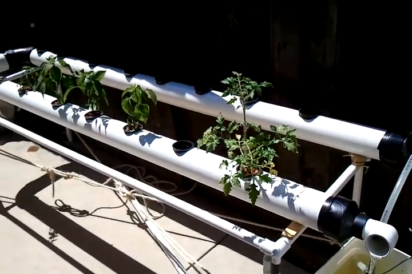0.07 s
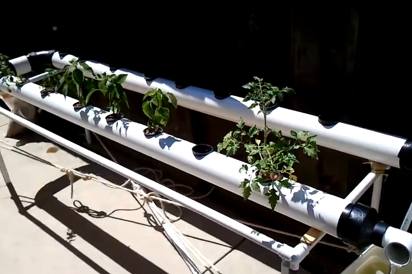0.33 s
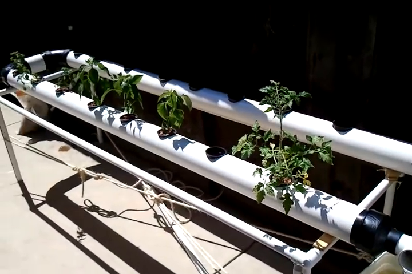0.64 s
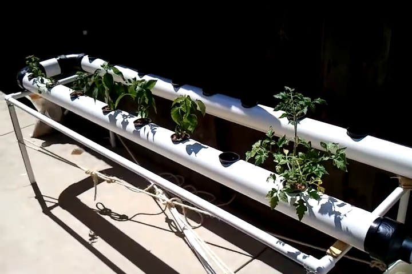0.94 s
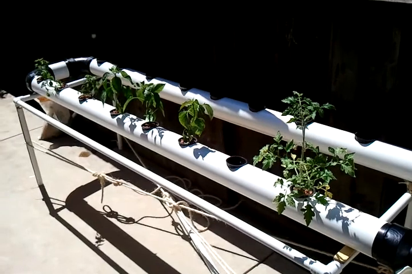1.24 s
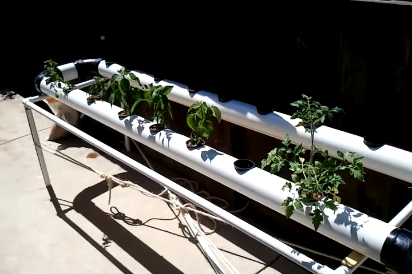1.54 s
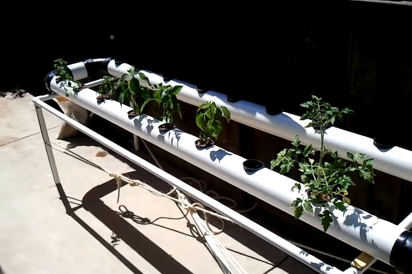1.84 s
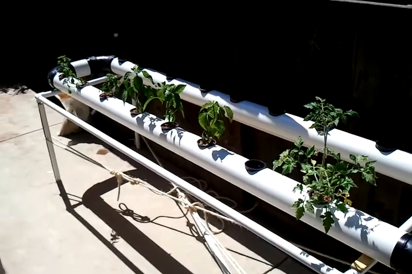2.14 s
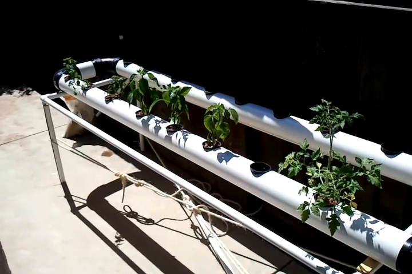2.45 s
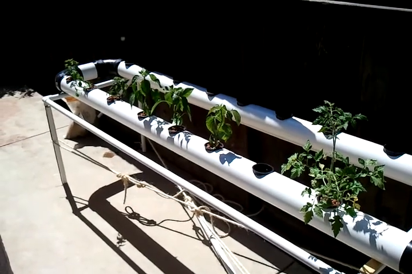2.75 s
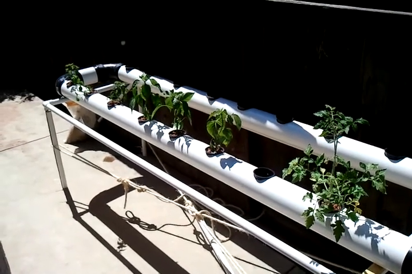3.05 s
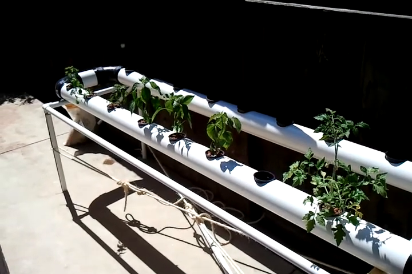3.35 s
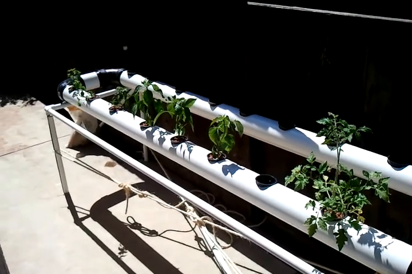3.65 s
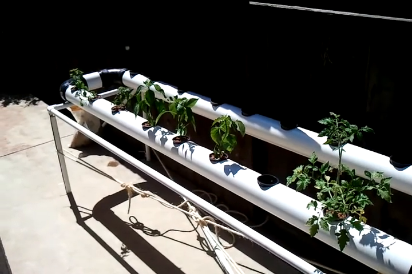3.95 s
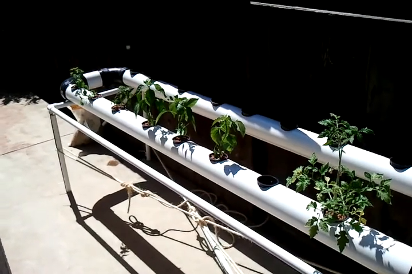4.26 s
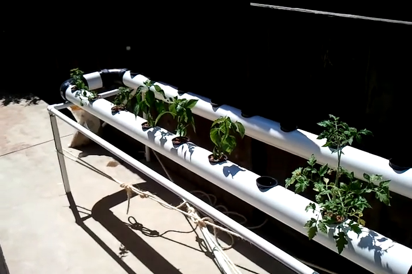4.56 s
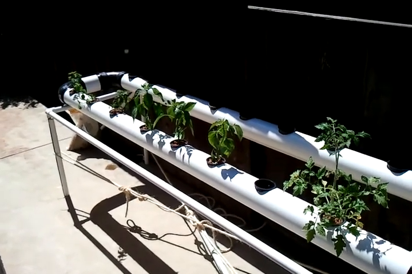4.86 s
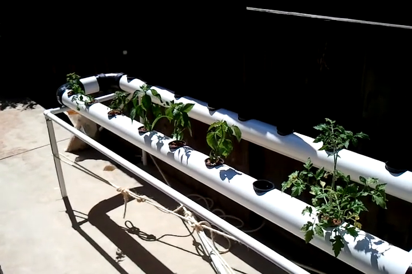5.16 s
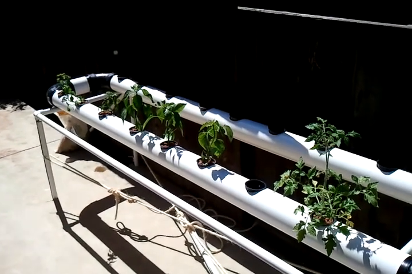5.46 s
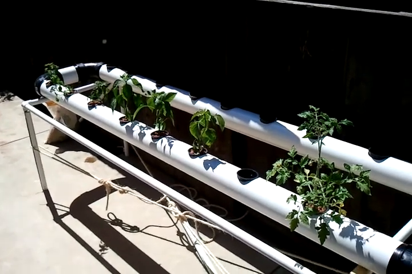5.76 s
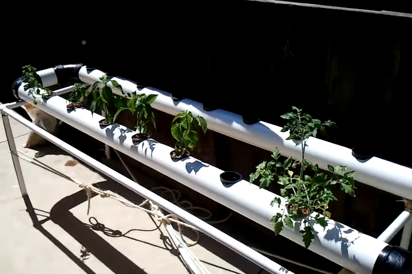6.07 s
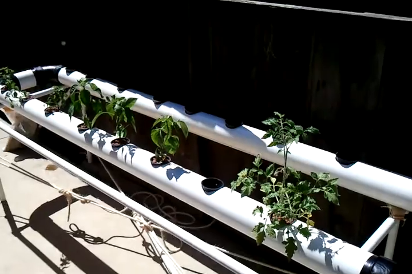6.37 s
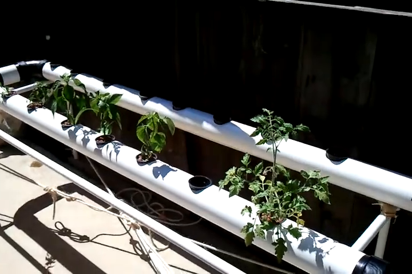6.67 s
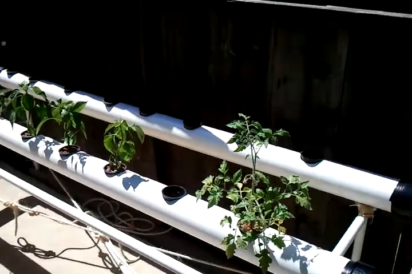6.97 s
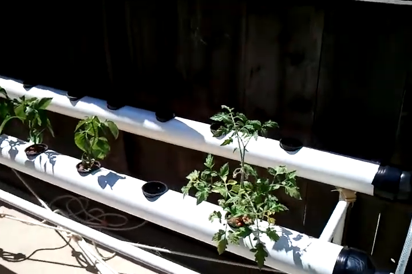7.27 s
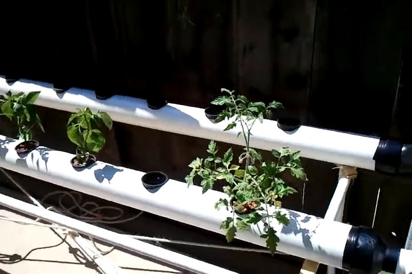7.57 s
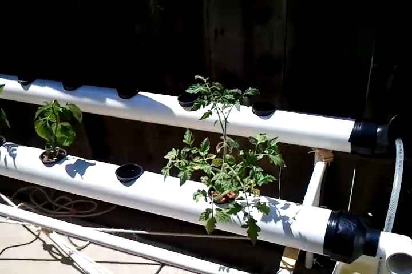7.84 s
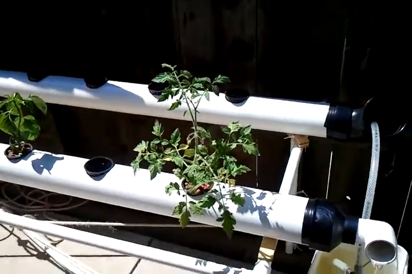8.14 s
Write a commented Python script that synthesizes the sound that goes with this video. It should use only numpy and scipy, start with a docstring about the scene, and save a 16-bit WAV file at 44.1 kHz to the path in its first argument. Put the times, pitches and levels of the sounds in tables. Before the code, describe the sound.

Steady bubbling water runs into a plastic bucket, joined later by sharp close knocks and rubbing from fingers handling the microphone.

```python
"""In a walled yard a pump hums and a far engine drones while the return pipe of a hydroponic rack
pours into a plastic bucket: churning bubbles, a hollow gurgle, fine spray. Gulps break through, each
dragging a surge of bubbles down with it, among bright plinks and splashes. From about 5.6 s, over the
running water, fingers knock on the case that holds the microphone, hard enough to overload it.
Their skin slides over the case in short strokes, which crowd into the last second."""
import sys
import numpy as np
from scipy import signal
from scipy.fft import rfft, irfft, next_fast_len
from scipy.io import wavfile

SR = 44100
rng = np.random.default_rng(int(sys.argv[2]) if len(sys.argv) > 2 else 0)


def waveform_to_disk(signal):
    """Save audio, clipped to [-1, 1], as 16-bit WAV at the path in sys.argv[1]."""
    frames = np.transpose(np.atleast_2d(signal))
    scaled = np.clip(frames, -1, 1) * 32767
    samples = np.round(scaled).astype(np.int16)
    wavfile.write(sys.argv[1], SR, samples)


N = 366459
TIME = np.arange(N) / SR

# even wash of pour and yard, blurred by the walls: (frequency [Hz], relative level [dB])
YARD_TONE = [(20, -13.5), (45, -3), (80, 0.5), (170, 6), (270, 2), (500, 4.5), (950, 4), (1300, -4),
             (1800, -5), (2700, -9.5), (5000, -13), (8000, -15.5)]
# pump, louder where the walls reinforce it: (time [s], relative level [dB])
PUMP_FADER = [(0, -61.5), (1.1, -70.5), (1.9, -63.5), (2.55, -70.5), (3.8, -56.5), (5.1, -56), (7.3, -63),
              (7.9, -75)]
# partials of the pump's hum: (multiple of the pitch, relative level [dB])
PUMP_PARTIALS = [(.5, -18), (1, 0), (1.5, -23), (2, -12), (2.5, -18)]
# partials of its mains buzz: (multiple of the pitch, level [dB])
MAINS_PARTIALS = [(1, -65.5), (3, -68), (4, -73), (5, -77.5), (6, -68.5)]
# far engine, unevenly running down: (time [s], firing rate [Hz], relative level [dB])
ENGINE_RUN = [(0, 112.9, -57), (.9, 113.7, -66), (1.6, 113.6, -62), (2.0, 104.2, -73), (2.5, 105, -57),
              (3.1, 107.7, -66), (3.8, 110.6, -56), (5.2, 108, -70), (6.3, 102.4, -61.5), (8.3, 102.4, -68)]
# weight of the churning bubbles by pitch: (pitch [Hz], relative level [dB])
CHURN_TONE = [(300, -8.5), (450, -16.5), (700, 2.5), (950, 3), (1280, -5.5), (1800, -1), (2600, -19),
              (4000, -7), (6000, -21)]
# resonances of the air above the water in the bucket: (frequency [Hz], width [Hz], boost [dB])
BUCKET_MODES = [(355, 35, 6.5), (493, 26, 9), (888, 31, 1), (1433, 120, 4.5)]
# the bucket's hollow note, clearest when its mouth faces the microphone: (time [s], level [dB])
GURGLE_FADER = [(0, -58.5), (.85, -59.5), (1.2, -64), (2.6, -77), (8.3, -63)]
# ticks of fine spray: (frequency [Hz], relative level [dB])
SPRAY_TONE = [(1200, 1), (2000, -2.5), (2800, 2), (4000, -8), (5000, 3), (6500, 4.5), (8000, -1.5),
              (10000, -6.5)]
# large air pockets pulled under: (time [s], relative level [dB], pitch [Hz], surge trim [dB])
GULP_CUES = [(0.048, -33, 885, -3), (0.17, -37, 900, -9), (0.491, -32.5, 953, -2), (0.76, -35, 990, 2),
             (0.869, -40.5, 970, 0), (1.048, -39, 1010, 0), (1.142, -35, 837, 6), (1.25, -42, 890, 6),
             (1.496, -37.5, 653, 4), (1.585, -40, 653, 8), (1.798, -33, 369, 0), (1.854, -37, 362, -2),
             (1.949, -29, 880, 1), (2.339, -33.5, 820, -6), (2.525, -36.5, 895, 1), (2.64, -46, 650, 11),
             (2.879, -38, 1016, 1), (3.2, -43, 900, 5), (3.329, -42.5, 890, 8), (3.607, -28, 868, -0.5),
             (3.649, -36.5, 527, -11), (3.734, -38, 960, -10), (4.05, -40, 838, 4), (4.272, -41, 354, -15),
             (4.606, -34, 652, 3), (4.891, -34, 905, -4), (5.15, -39.5, 845, 6), (5.313, -33, 350, 0.5),
             (5.359, -37, 887, -2), (5.438, -34, 640, 1), (5.486, -30.5, 867, -3), (6.956, -31.5, 528, 4)]
# the clearest small bubbles: (time [s], relative level [dB], pitch [Hz])
PLINK_CUES = [(0.0726, -47, 1720), (0.4343, -44, 1810), (0.555, -46, 1780), (0.664, -44, 1970),
              (1.282, -43.5, 2180), (1.3824, -43, 3540), (1.4331, -48, 3560), (2.5516, -47, 1790),
              (2.923, -45, 1680), (3.052, -44.5, 1953), (3.4067, -40.5, 4630), (3.585, -46, 2960),
              (4.6466, -48, 1850), (5.0427, -42.5, 5230), (5.096, -49, 1970), (6.5127, -43.5, 4800)]
# the largest drops slapping the surface: (time [s], relative level [dB])
SPLASH_CUES = [(0.115, -41.5), (0.1836, -46), (0.3113, -40.5), (0.3975, -42), (0.806, -42.5),
               (1.1698, -42.5), (1.231, -39), (1.4367, -44), (2.2566, -46), (2.564, -41), (2.8785, -37),
               (2.9218, -42), (4.4842, -43), (4.8865, -40), (5.1425, -41), (6.0374, -46), (6.6965, -42.5),
               (6.7354, -43.5), (7.1891, -42.5)]
# fingers on the case: (time [s], strength [dB], contact brightness [Hz], pitch ratio set by the grip)
KNOCK_CUES = [(5.5767, 21, 784, 1.19), (5.6454, 25.5, 1360, 1.18), (5.688, 36.5, 1396, 1.23),
              (5.7781, 19.5, 1030, 1), (5.7933, 14, 790, 1.06), (6.2245, 19.5, 1068, 0.99),
              (6.3346, 19.5, 1035, 0.98), (6.8836, 26, 1100, .98), (7.3054, 25.5, 1206, 0.96),
              (7.323, -1, 665, 0.56), (7.338, -7, 600, 0.6), (7.3566, -4, 600, 0.61),
              (7.391, 18, 586, 0.59), (7.3948, 11, 950, 1.04), (7.485, 1.5, 2050, 1.34),
              (7.5975, 20.5, 970, 1.02), (7.6992, 29, 720, 0.8), (7.7067, 16, 770, 1.15),
              (7.7939, 17, 970, 0.99), (7.829, -7, 660, 0.67)]
# resonances of the case: (frequency [Hz], width [Hz], boost [dB], share of the grip's pitch shift)
CASE_MODES = [(519, 154, 9.5, 0.52), (1120, 194, 7.5, 0.69), (1762, 160, 12.5, 0.074),
              (2840, 210, 18, 0.85), (4730, 1220, 11, 0.56)]
# colour of the crunch that overload adds: (frequency [Hz], gain [dB])
OVERLOAD_TONE = [(60, -18), (160, -11), (350, 0), (7000, 0), (8500, -10), (16000, -8)]
# skin sliding over the case: (time [s], swell [s], length [s], level [dB], hiss against the rub [dB])
STROKE_CUES = [(5.863, .015, .022, -41, -16), (5.877, .025, 0.033, -37.5, -11.5),
               (6.94, 0.039, 0.1, -52.5, -14), (7.114, 0.022, 0.043, -51.5, -12),
               (7.358, .02, 0.04, -47, -11.5), (7.479, 0.0035, 0.22, -37.5, -9.5),
               (7.502, .04, 0.12, -37, -6), (7.698, 0.036, 0.087, -32.5, -14.5),
               (7.816, 0.047, 0.087, -39, -12), (7.969, 0.012, 0.053, -36.5, -4.5),
               (8.014, 0.028, 0.19, -37, -12), (8.189, 0.03, 0.061, -31.5, -22),
               (8.264, 0.025, .04, -32.5, -21)]
# hollow rub through the case: (frequency [Hz], relative level [dB])
RUB_TONE = [(100, -27.5), (350, -28), (550, -11), (800, -4.5), (1050, 0.5), (1300, -1.5), (1600, 2.5),
            (1900, -5), (2300, -13), (3000, -24), (4500, -34)]
# hiss of the skin: (frequency [Hz], relative level [dB])
HISS_TONE = [(1500, -28.5), (2400, -5), (3000, 2), (3900, -3), (5200, 2), (6500, -4.5), (8000, -9),
             (10000, -30.5)]


def from_db(db):
    """Decibels to gain."""
    return 10 ** (np.asarray(db) / 20)


def unit_rms(x):
    """Scale to rms 1."""
    return x / np.sqrt(np.mean(x ** 2) + 1e-20)


def automation(rows):
    """Each column of a timed curve, at every sample."""
    times, *columns = np.transpose(rows)
    return [np.interp(TIME, times, column) for column in columns]


def db_at(tone, hz):
    """Read a tone curve on a log-frequency axis."""
    known_hz, db = np.transpose(tone)
    return np.interp(np.log(hz + 1e-3), np.log(known_hz), db)


def colour(x, tone):
    """Equalise with a tone curve; rms 1."""
    size = next_fast_len(N)
    hz = np.arange(size // 2 + 1) * SR / size
    return unit_rms(irfft(rfft(x, size) * from_db(db_at(tone, hz)), size)[:N])


def drift(rate_hz):
    """Smooth random wander of spread 1."""
    hop, settle = 40, 2000
    pole = np.exp(-2 * np.pi * hop * rate_hz / SR)
    noise = rng.standard_normal(N // hop + settle + 2)
    slow = signal.lfilter([1], [1, -2 * pole, pole * pole], noise)[settle:]
    return np.interp(np.arange(N) / hop, np.arange(len(slow)), unit_rms(slow))


def band_pass(x, hz, kind, order):
    """Pass the band below ("low") or above ("high") a corner."""
    return signal.sosfilt(signal.butter(order, hz, kind, fs=SR, output="sos"), x)


def resonate(x, modes):
    """Pass a signal through a chain of resonant peaks."""
    for hz, width, boost_db in modes:
        damping, tuning = np.pi * width / SR, -2 * np.cos(2 * np.pi * hz / SR)
        peak = damping * from_db(boost_db)
        x = signal.lfilter([1 + peak, tuning, 1 - peak], [1 + damping, tuning, 1 - damping], x)
    return x


def add(out, start_s, sound):
    """Mix a short sound in at its cue."""
    at = int(np.clip(round(start_s * SR), 0, N - 1))
    out[at:at + len(sound)] += sound[:N - at]


def reflections(x, t60, wet_db):
    """Add dense, dying echoes off nearby surfaces."""
    t = TIME[:SR // 2]
    tail = rng.standard_normal(len(t)) * from_db(-60 * t / t60) * (t > .002)
    return x + from_db(wet_db) * signal.fftconvolve(x, tail / np.linalg.norm(tail))[:N]


def yard_air(level_db):
    """The bed: the walls blur pour and yard into an even wash."""
    return from_db(level_db) * colour(rng.standard_normal(N), YARD_TONE)


def hum(hz, partials, wobble, wobble_hz):
    """Partials on a common pitch, which wanders by the fraction `wobble`."""
    pitch = hz * (1 + wobble * drift(wobble_hz))
    phase = 2 * np.pi * np.cumsum(pitch) / SR
    return sum(from_db(db) * np.sqrt(2) * np.sin(multiple * phase + rng.uniform(0, 2 * np.pi))
               for multiple, db in partials)


def pump(motor_hz, mains_hz, whine_hz):
    """The pump's hum swells and sinks beside its mains buzz and a thin whine."""
    fader_db, = automation(PUMP_FADER)
    motor = from_db(fader_db - 1 + .42 * drift(3.3)) * hum(motor_hz, PUMP_PARTIALS, .0016, 2.54)
    buzz = from_db(1.265 * drift(.72)) * hum(mains_hz, MAINS_PARTIALS, .00055, 1.25)
    whine = from_db(-72.5 + 1.2 * drift(.88)) * hum(whine_hz, [(1, 0)], .00046, 2.7)
    return motor + buzz + whine


def far_engine():
    """A distant engine drones at its firing rate and the octave above."""
    firing_hz, fader_db = automation(ENGINE_RUN)
    gain = from_db(fader_db + .8 * drift(5))
    return gain * hum(firing_hz, [(1, -6), (2, -13.5)], wobble=.0058, wobble_hz=6.8)


def bubble(hz, cycles, rise):
    """A bubble rings down 60 dB in so many cycles, its pitch rising as it nears the surface."""
    t = TIME[:int(cycles / hz * SR) + 2]
    age = t * hz / cycles
    envelope = from_db(-60 * age) * (1 - np.exp(-2 * hz * t))
    return envelope * np.sin(2 * np.pi * hz * t * (1 + rise * age / 2))


def churn(count, cycles, spread_db):
    """The stream drags a cloud of bubbles of all sizes under the surface."""
    out = np.zeros(N)
    for when, pitch, strength, life, rise in rng.random((count, 5)):
        hz = 300 * 20 ** pitch
        gain = from_db(db_at(CHURN_TONE, hz) + spread_db * min(-np.log(strength), 2.5))
        ring_cycles = cycles * (.5 + life) * np.sqrt(hz / 1000)  # small bubbles ring for more cycles
        add(out, when * N / SR, gain * bubble(hz, ring_cycles, .19 * rise))
    return unit_rms(resonate(out, BUCKET_MODES))


def gurgle(count, centre_hz, spread_octaves, waver_db):
    """Bubbles of nearly one size keep the air in the bucket ringing: a hollow, wavering note."""
    waver = from_db(waver_db * drift(5))
    out = np.zeros(N)
    for when, pitch, strength in rng.random((count, 3)):
        hz = centre_hz * 2 ** (spread_octaves * (pitch - .5))
        add(out, when * N / SR, (.5 + strength) * bubble(hz, cycles=37, rise=.04))
    fader_db, = automation(GURGLE_FADER)
    return waver * from_db(fader_db) * unit_rms(out)


def spray(per_s, spread_db, clump_db):
    """Fine droplets tick on the water in little showers."""
    landings = rng.random(N) < per_s / SR
    strength = from_db(spread_db * np.minimum(rng.exponential(1, N), 4) + clump_db * drift(41))
    return colour(landings * strength * rng.choice([-1, 1], N), SPRAY_TONE)


def drops(count, loudest_db, range_db):
    """Stray drops land one by one; each traps a tiny bubble that ticks at a pitch of its own."""
    out = np.zeros(N)
    for when, pitch, softness, life in rng.random((count, 4)):
        tick = bubble(3200 + 4500 * pitch, cycles=5 + 24 * life ** 2, rise=.1)
        add(out, when * N / SR, from_db(loudest_db - range_db * softness) * tick)
    return out


def gulps(body_db, shard_db, ring_s, shard_count):
    """A big bubble rings, and breaks into a few weaker ones that sound the bucket."""
    body, shards = np.zeros(N), np.zeros(N)
    for start_s, db, hz, _ in GULP_CUES:
        add(body, start_s, from_db(db + body_db) * bubble(hz, cycles=ring_s * hz, rise=.37))
        for lag, pitch in rng.random((shard_count, 2)):
            shard = bubble(380 + 1000 * pitch ** 1.4, cycles=15, rise=.17)
            add(shards, start_s + .037 * lag ** 2, from_db(db + shard_db) * shard)
    return body + resonate(shards, BUCKET_MODES)


def surges(trim_db, attack_s, decay_s):
    """Envelope of the bubble cloud that each gulp drags down: a quick swell that dies away."""
    out, t = np.zeros(N), TIME[:SR // 2]
    swell = (1 - np.exp(-t / attack_s)) * np.exp(-t / decay_s)
    for start_s, db, _, surge_db in GULP_CUES:
        add(out, start_s, from_db(db + surge_db + trim_db) * swell)
    return out


def plinks(trim_db, cycles, faint_db, faint_hz, faint_count):
    """Single small bubbles ring clear, with fainter ones at random between them."""
    out = np.zeros(N)
    for start_s, db, hz in PLINK_CUES:
        add(out, start_s, from_db(db + trim_db) * bubble(hz, cycles, rise=.08))
    for when, pitch in rng.random((faint_count, 2)):
        hz = faint_hz * 1.35 ** (pitch - .5)
        add(out, when * N / SR, from_db(faint_db) * bubble(hz, cycles, rise=.08))
    return out


def splashes(t60, trim_db):
    """A larger drop slaps and scatters in a short, bright burst."""
    envelope = np.zeros(N)
    for start_s, db in SPLASH_CUES:
        add(envelope, start_s, from_db(db + trim_db - 60 * TIME[:SR // 10] / t60))
    return envelope * colour(rng.standard_normal(N), SPRAY_TONE)


def water(churn_db, unrest_db, spray_db):
    """The water bus: a bubbling body and a sparkling top, echoing faintly in the yard."""
    even_flow = from_db(churn_db - unrest_db * drift(12.4))
    flow = np.hypot(even_flow, surges(trim_db=-17, attack_s=.005, decay_s=.022))
    body = flow * reflections(churn(count=5500, cycles=16.4, spread_db=2), t60=.039, wet_db=-4)
    body += gurgle(count=1200, centre_hz=954, spread_octaves=.5, waver_db=2)
    body += gulps(body_db=-10, shard_db=-14, ring_s=.092, shard_count=6)
    mist = spray(per_s=3000, spread_db=4, clump_db=4.8)
    top = from_db(spray_db) * reflections(mist, t60=.012, wet_db=-5)
    top += drops(count=300, loudest_db=-39.5, range_db=12.5)
    top += splashes(t60=.029, trim_db=-3)
    top += plinks(trim_db=-.5, cycles=71, faint_db=-48.5, faint_hz=1985, faint_count=12)
    return reflections(body + top, t60=.18, wet_db=-7)


def knocks(low_cut_hz, high_cut_hz):
    """A soft fingertip gives one rounded push; the case rings briefly, its modes bent by the grip."""
    out = np.zeros(N)
    for start_s, db, contact_hz, grip in KNOCK_CUES:
        push = band_pass(from_db(db) * signal.unit_impulse(SR // 20), contact_hz, "low", order=4)
        push = band_pass(push, low_cut_hz * grip ** 1.02, "high", order=2)
        push = band_pass(push, high_cut_hz, "low", order=1)
        modes = [(hz * grip ** share, width, boost_db) for hz, width, boost_db, share in CASE_MODES]
        add(out, start_s, resonate(push, modes))
    return out


def slide(grain_db, sag_db_per_s, hiss_fade_db_per_s, release_db_per_s):
    """Skin catches and slips in tiny steps: each stroke swells to a hollow rub, hissing most early on."""
    rub_power, hiss_power, t = np.zeros(N), np.zeros(N), TIME[:SR // 2]
    for start_s, swell_s, length_s, db, hiss_db in STROKE_CUES:
        swell = np.minimum(t / swell_s, 1) ** 2
        release_db = release_db_per_s * np.maximum(t - length_s, 0)
        stroke = swell * from_db(db - sag_db_per_s * t - release_db)
        add(rub_power, start_s, stroke ** 2)
        add(hiss_power, start_s, (stroke * from_db(hiss_db - hiss_fade_db_per_s * t)) ** 2)
    slips = rng.standard_normal(N) * from_db(grain_db * drift(160))
    return np.sqrt(rub_power) * colour(slips, RUB_TONE) + np.sqrt(hiss_power) * colour(slips, HISS_TONE)


def scene():
    """The mono mix: water and machines over the air of the yard, with the fingers right up close."""
    mix = yard_air(level_db=-56.5)
    mix += water(churn_db=-58, unrest_db=.3, spray_db=-65.5)
    mix += pump(motor_hz=146.5, mains_hz=119.9, whine_hz=1522)
    mix += far_engine()
    mix += knocks(low_cut_hz=400, high_cut_hz=1808)
    mix += slide(grain_db=1.5, sag_db_per_s=7.5, hiss_fade_db_per_s=18.5, release_db_per_s=514)
    return mix[None]


def record(dry):
    """A narrow-band microphone path that saturates on the knocks; then a steep cut takes off the top."""
    stopband_hz, ceiling, high_cut_hz = 9700, .7, 16300
    narrow = signal.sosfilt(signal.cheby2(10, 60, stopband_hz, fs=SR, output="sos"), dry)
    clipped = narrow / (1 + (narrow / ceiling) ** 10) ** (1 / 10)
    size = next_fast_len(N + SR // 10)
    hz = np.arange(size // 2 + 1) * SR / size
    crunch = rfft(clipped - narrow, size) * from_db(db_at(OVERLOAD_TONE, hz))
    high_cut = 1 / np.sqrt(1 + (hz / high_cut_hz) ** 160)
    return irfft((rfft(narrow, size) + crunch) * high_cut, size)[:, :N]


dry = scene()
out = record(dry)
waveform_to_disk(out)
```